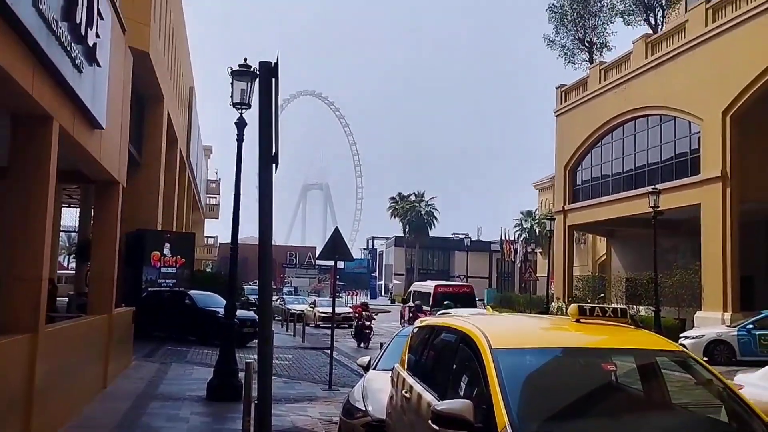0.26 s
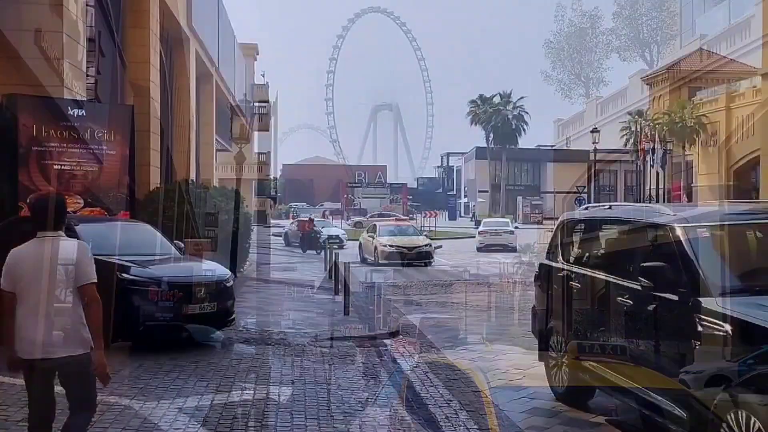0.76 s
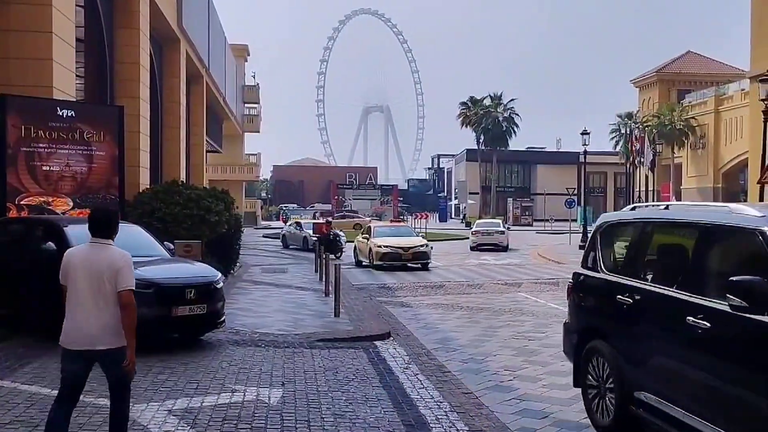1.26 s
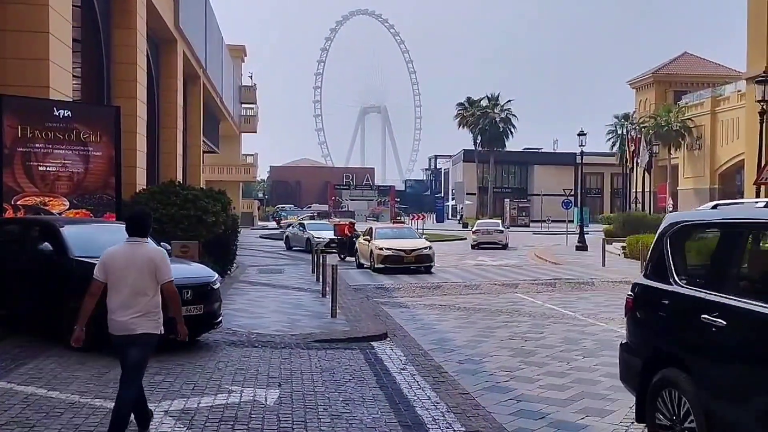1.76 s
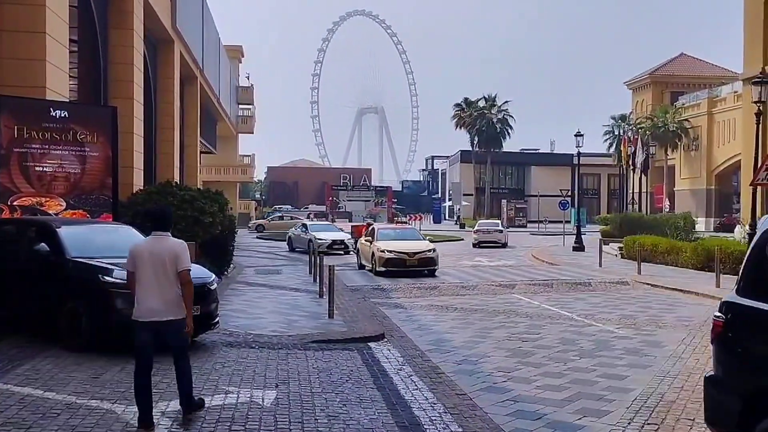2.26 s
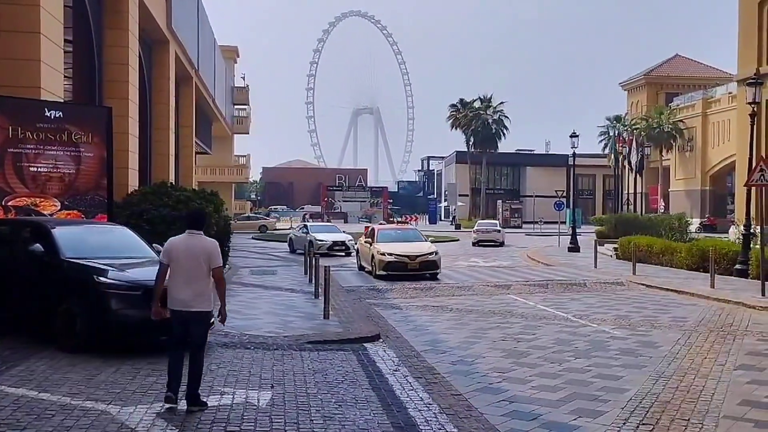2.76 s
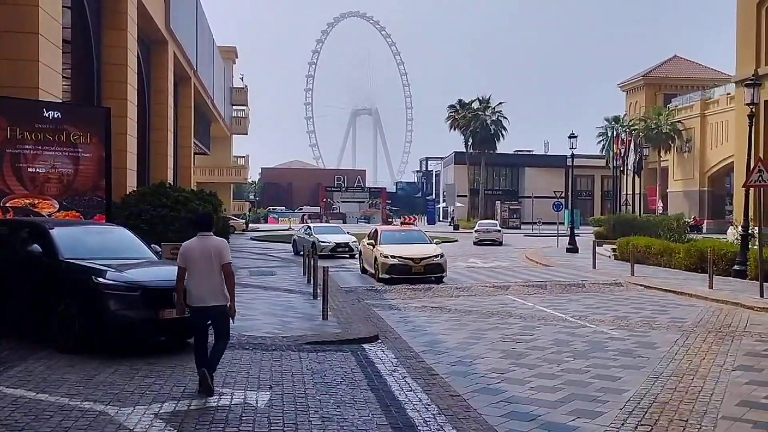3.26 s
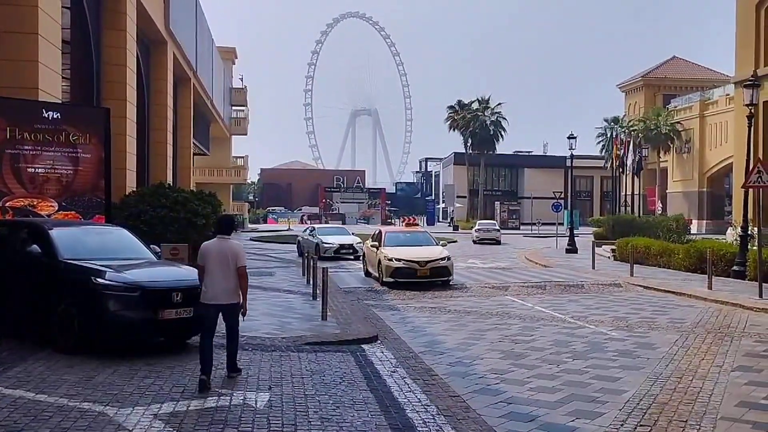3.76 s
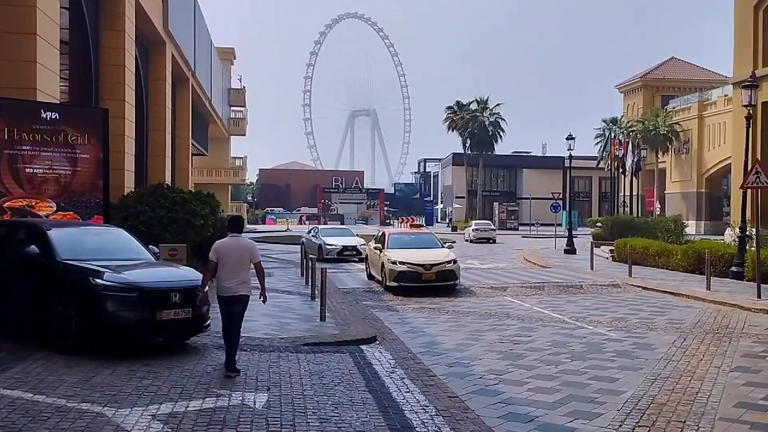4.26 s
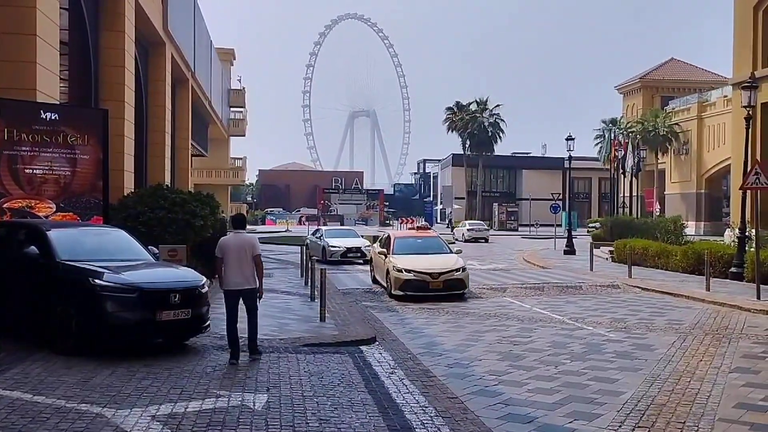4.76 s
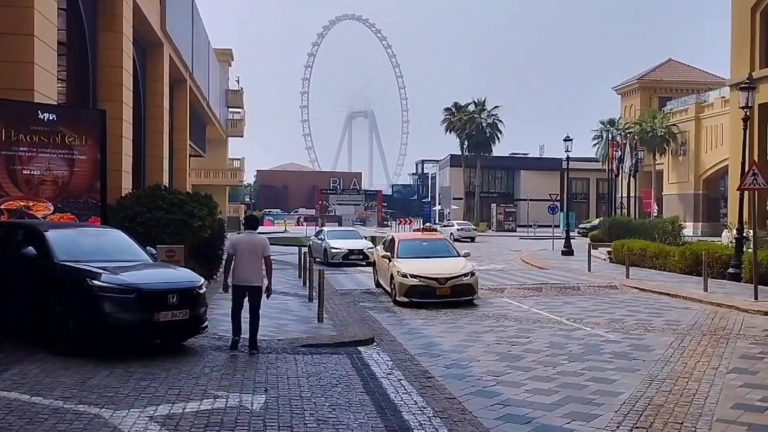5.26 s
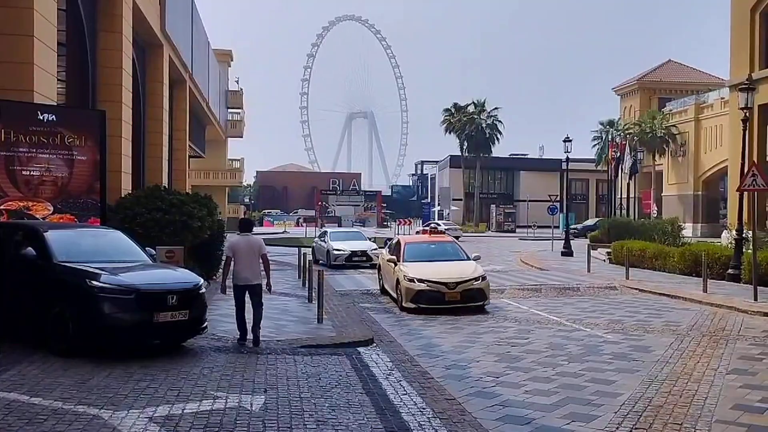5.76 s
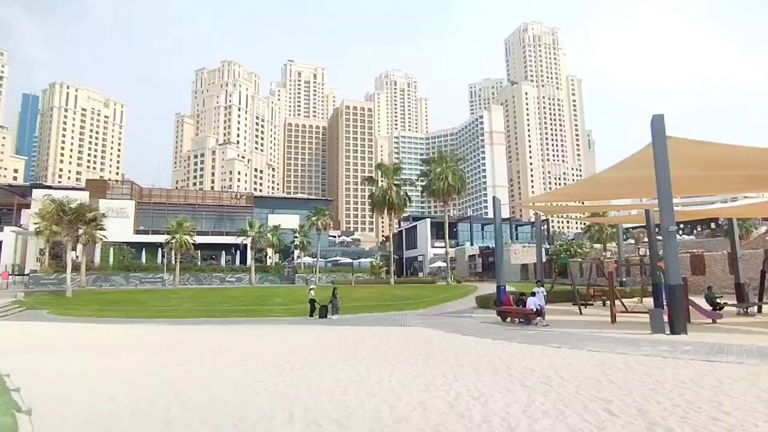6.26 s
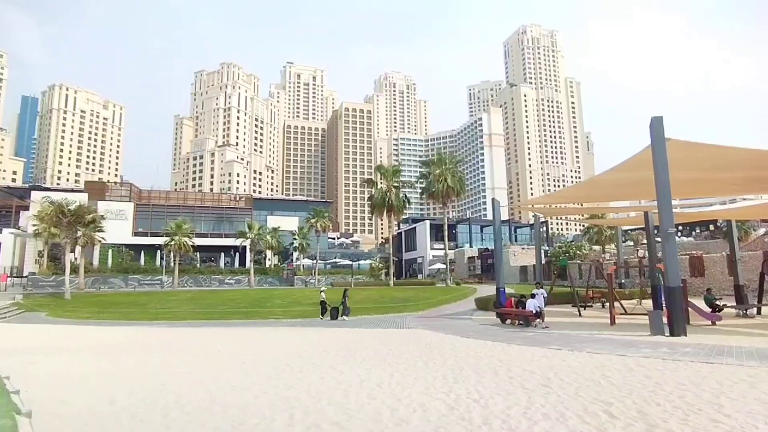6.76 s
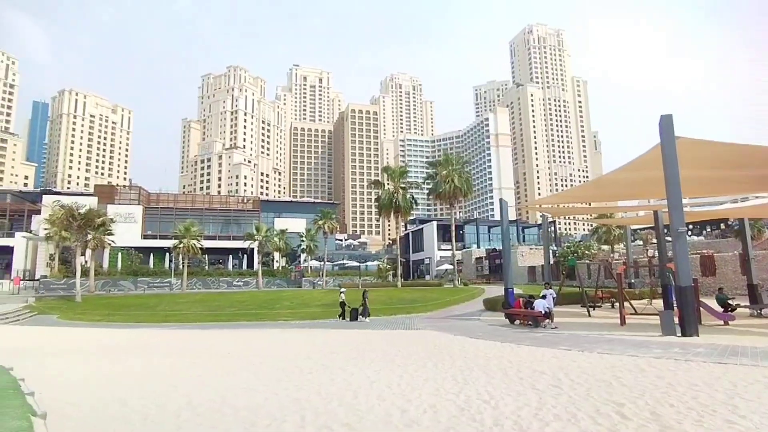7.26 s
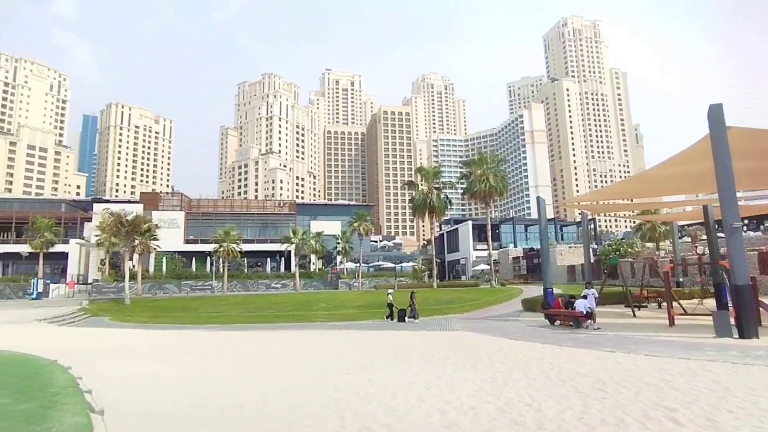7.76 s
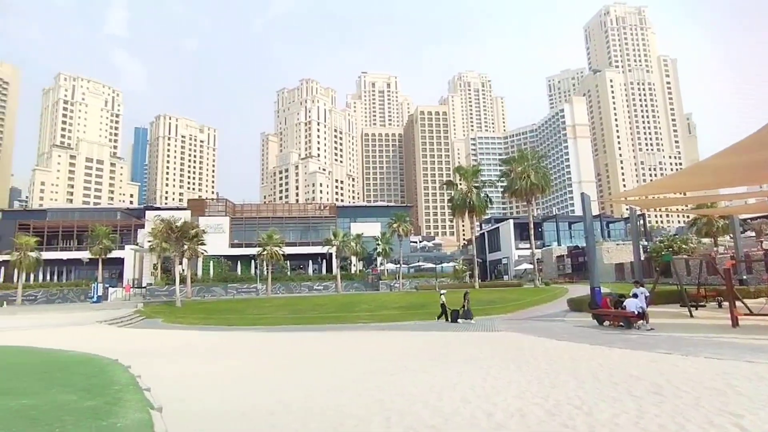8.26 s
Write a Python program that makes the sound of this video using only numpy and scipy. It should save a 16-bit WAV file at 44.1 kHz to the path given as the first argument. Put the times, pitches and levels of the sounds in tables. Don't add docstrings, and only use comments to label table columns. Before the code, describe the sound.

Steady street roar, engine hum and squeaky brakes stop abruptly; after a short gap, soft wind, close gritty crunches and a faint insect trill.

```python
import sys
import numpy as np
from scipy import signal
from scipy.fft import rfft, irfft, next_fast_len
from scipy.io import wavfile
from scipy.ndimage import uniform_filter1d, map_coordinates

SR = 44100
rng = np.random.default_rng(int(sys.argv[2]) if len(sys.argv) > 2 else 0)


def inscribe(sig):
    pcm = np.round(np.clip(np.atleast_2d(sig).T, -1, 1) * 32767)
    wavfile.write(sys.argv[1], SR, pcm.astype(np.int16))


def voltage_ratio(level):
    return 10 ** (np.asarray(level, float) / 20)


N = 375732
T = np.arange(N) / SR

STREET_LAG, PARK_LAG = 15, -22
DISSOLVE_START_S, DISSOLVE_END_S = 0.47, 1.02
WAKE_START_S = 6.232
ENGINE_RAMP_S = 0.081

# frequency [Hz], left level [dB], right level [dB].
PARK_TREBLE = [(1500, -48, -47), (1950, -47.5, -46.5), (2600, -51.5, -46.5), (3730, -59.5, -55),
               (4700, -63, -53.5), (5620, -68, -56.5), (6900, -73, -66), (7650, -72, -86), (8150, -79, -86),
               (9400, -72, -74), (10300, -72, -75), (11050, -72, -86), (12400, -65.5, -74),
               (15000, -69, -74), (15600, -65.5, -72.5)]
# time [s], gain [dB].
PARK_FADE = [(6.204, -14), (6.215, -3), (6.232, -6), (6.238, 2), (6.3, 4.5), (9, 5.5)]


def unit(x):
    return x / np.sqrt(np.mean(np.atleast_2d(x).mean(0) ** 2) + 1e-20)


def along(points, hz):
    f, *cols = np.transpose(points)
    return np.array([np.interp(np.log(hz + 1), np.log(f + 1), c) for c in cols])


def curves(rows):
    s, *cols = np.transpose(rows)
    return [np.interp(T, s, c) for c in cols]


def wobble(rate):
    coarse_s = np.arange(0, N + 16, 16) / SR
    knots = rng.standard_normal(int(N * rate / SR) + 4)
    return np.interp(T, coarse_s, map_coordinates(knots, [coarse_s * rate]))


def filtered(x, response):
    m = next_fast_len(x.shape[-1] + 8192)
    spectrum = rfft(x, m) * response(np.fft.rfftfreq(m, 1 / SR))
    return irfft(spectrum, m)[..., :x.shape[-1]]


def tone(hz, db, drift_hz, flutter_db, rate):
    level = np.sqrt(2) * voltage_ratio(db + flutter_db * wobble(rate))
    phase = 2 * np.pi * np.cumsum(hz + drift_hz * wobble(rate)) / SR
    return level * np.sin(phase)


def spells(rows, ramp_s):
    gain = np.zeros(N)
    for start_s, end_s, db in rows:
        rise = np.clip((T - start_s) / ramp_s + .5, 0, 1)
        fall = np.clip((end_s - T) / ramp_s + .5, 0, 1)
        gain += voltage_ratio(db) * rise * fall
    return gain


def layers(low, high, alike, lag, patchy_db):
    cross_hz = [130, 1500, 8100]
    z = signal.stft(rng.standard_normal((2, N)), nperseg=512)[2]
    field = uniform_filter1d(rng.standard_normal(z.shape[1:]), size=6, axis=0)
    field = uniform_filter1d(field, size=12, axis=1)
    pair = signal.istft(z * voltage_ratio(patchy_db * field / field.std()), nperseg=512)[1][:, :N]

    def split(hz):
        turn = np.arccos(np.clip(along(alike, hz)[0], -1, 1)) / 2
        return np.array([np.cos(turn), np.sin(turn)])

    def colour(hz):
        late = np.exp(np.outer([-1j, 1j], np.pi * hz * lag / SR * (hz > 1200)))
        return voltage_ratio(along(low + high[1:], hz)) * late

    same, other = filtered(pair, split)
    ports = filtered(np.array([same + other, same - other]), colour)
    below = [filtered(ports, lambda hz: 1 / (1 + (hz / edge) ** 12)) for edge in cross_hz]
    return [unit(hi - lo) for lo, hi in zip([0] + below, below + [ports])]


def traffic(share):
    # frequency [Hz], left level [dB], right level [dB].
    kerb_low = [(5, 4, -9), (12, -11, 10.5), (25, -5, 1), (45, -1, 1), (91.4, 4.5, -12), (129, -13.5, 1.5),
                (189, -5, -20.5), (260, -10.5, -5), (342, -11.5, -15), (415, -19, -14), (600, -20.5, -21),
                (840, -25, -22.5), (1160, -28, -26.5), (1500, -32, -30)]
    kerb_high = [(1500, -31, -29), (1950, -34.5, -33), (2620, -35, -31), (3030, -40.5, -34.5),
                 (3600, -42, -34.5), (4640, -43, -38), (5500, -58, -41), (6600, -60, -41.5),
                 (7400, -62, -51.5), (8050, -62, -53.5), (10400, -49.5, -56.5), (11150, -65.5, -61),
                 (12100, -50, -51.5), (15000, -47.5, -54), (15700, -51, -46.5)]
    street_low = [(5, -17, -21), (12, -17, -29), (25, -10.5, 0.5), (45, -8, -10.5), (99, -10, -7),
                  (129, -11, -11), (197, -11.5, -10.5), (258, -14, -13), (304, -13, -13), (393, -16.5, -17),
                  (620, -21.5, -21), (825, -22.5, -22), (1114, -26.5, -28.5), (1560, -29, -30)]
    street_high = [(1500, -29, -29), (1920, -33, -33.5), (2580, -38, -32.5), (3700, -43, -35),
                   (4730, -45, -38.5), (5570, -43.5, -43.5), (6800, -52.5, -50), (7640, -54, -57.5),
                   (8500, -55, -71), (9620, -50.5, -59), (10900, -51, -74), (12500, -46, -59),
                   (15300, -50, -59), (15700, -54, -53.5)]
    # frequency [Hz], correlation [-1..1].
    alike = [(20, 0.86), (60, 0.94), (150, 0.97), (300, 0.91), (640, 0.69), (1200, 0.24), (1700, 0.48),
             (2100, 0.56), (2600, 0.11), (3400, 0.064), (4200, 0.091), (5800, 0.18), (7000, .05)]
    # time [s], nearness [dB], bearing [-1 right .. 1 left].
    passing = [(0, 6.5, 0.38), (.29, 3, 0.046), (.59, -5, -0.59), (1.0, -3.5, -0.47), (1.35, 1, -0.35),
               (2.7, 4.5, -0.14), (3.4, 3.5, 0.14), (4.45, 3, .4), (4.7, 0, .2), (5.2, -3.5, -0.41),
               (6.09, -4, -0.18)]
    # time [s], rumble gain [dB].
    heavy = [(0, 1), (.3, 0), (.55, 0), (1.0, -1.5), (1.4, -3), (2.6, 2), (3.6, 0.5), (4.5, 1), (4.7, -3),
             (5.15, 3), (5.35, -2.5), (6.09, -2.5)]
    kerb_db = [-24, -27.5, -41.5, -56]
    street_db = [-27, -28.5, -43, -56.5]
    grows = [.05, .15, .35, 1.0]
    lean_db, rest_lean_db, swell_db = 9, -2.5, -0.3

    kerb = layers(kerb_low, kerb_high, alike, STREET_LAG, patchy_db=1.0)
    street = layers(street_low, street_high, alike, STREET_LAG, patchy_db=0.36)
    near_db, bearing = curves(passing)
    mixed = []
    for grow, a_db, b_db, a, b in zip(grows, kerb_db, street_db, kerb, street):
        both = voltage_ratio(a_db) * np.sqrt(1 - share) * a + voltage_ratio(b_db) * np.sqrt(share) * b
        mixed.append(voltage_ratio(grow * near_db) * both)
    rumble, roar, tyres, air = mixed
    rumble = rumble * voltage_ratio(curves(heavy)[0] + swell_db * wobble(3.1))
    air = air * voltage_ratio(np.outer([0, -1], rest_lean_db + lean_db * bearing))
    return rumble + roar + tyres + air


def sparrows():
    # middle [s], pitch [Hz], length [s], level [dB], left minus right [dB].
    chirps = [(.178, 4600, .045, -56, -2), (.45, 2680, .04, -44, -3), (.88, 5570, .08, -57, 3),
              (1.37, 5150, 0.045, -47, 3), (3.37, 4385, .055, -45, -3), (4.008, 4680, .06, -42.5, -5),
              (4.022, 4280, .05, -54, 0), (4.11, 5260, .04, -49, 3), (4.192, 4238, 0.047, -50, -3),
              (4.89, 5150, 0.05, -49, 2), (5.402, 5150, .04, -52, 1), (5.45, 5200, .04, -56, 4),
              (7.12, 5100, .04, -67, -14), (8.12, 4200, .03, -64, -8), (7.1, 2400, .05, -60, -4)]
    sag, arch = -0.006, .02
    out = np.zeros((2, N))
    flutter = voltage_ratio(3.2 * wobble(200) - 1.5)
    for s, hz, length_s, db, pan_db in chirps:
        count = int(length_s * SR)
        start = int((s - length_s / 2) * SR)
        u = np.arange(count) / count
        swell = np.sin(np.pi * u)
        pitch_hz = hz * (1 + sag * (u - .5) + arch * (swell - .7)) + 15 * np.sin(12 * u)
        note = swell ** 0.58 * flutter[start:][:count] * np.sin(2 * np.pi * np.cumsum(pitch_hz) / SR)
        out[:, start:][:, :count] += np.outer(voltage_ratio(db + np.array([.5, -.5]) * pan_db), note)
    return out


def engines():
    # start [s], end [s], level [dB].
    idle = [
        (1.3, 3.7, -32),
        (3.7, 6.193, -33),
    ]
    # time [s], pitch [Hz], level [dB].
    pulling = [(.7, 151, -33), (1.5, 154, -32), (1.9, 143, -36), (2.4, 153, -31.5), (4.1, 146, -34),
               (4.5, 145, -76), (4.95, 143, -30), (5.25, 146.3, -51), (5.55, 144, -29.5),
               (6.09, 145, -41.5)]
    # engine order [Hz], level [dB].
    drones = [(228, -49), (270, -43.5), (306, -51), (345, -48), (652, -53.5)]
    out = spells(idle, ENGINE_RAMP_S) * tone(69.7, 0, 2.515, 1.3, rate=8)
    out = out + tone(*curves(pulling), 1.82, 1.5, rate=9)
    return out + sum(tone(hz, db, 1.516, 2.1, rate=4) for hz, db in drones)


def fan_whistle():
    # time [s], pitch [Hz], level [dB].
    whistle = [(1.6, 7360, -66), (2.2, 7240, -51), (3.0, 7200, -54), (3.55, 6960, -49.5), (4.4, 6900, -54),
               (4.8, 6950, -94)]
    return np.array([tone(*curves(whistle), 30, 1.5, rate=8) * wobble(800) * voltage_ratio(db) for db in (-6, -10)])


def brake_squeal():
    # start [s], end [s], level [dB].
    squeals = [(.75, .82, -45), (1.1, 1.15, -52), (1.2, 1.46, -57), (4.15, 5.95, -65), (3.2, 3.4, -64),
               (4.18, 4.36, -55), (4.39, 4.49, -49.5), (4.53, 4.58, -49), (4.67, 4.82, -52.5),
               (4.92, 4.97, -49), (5.01, 5.07, -51), (5.15, 5.3, -46), (5.35, 5.43, -56), (5.47, 5.62, -59),
               (5.71, 5.86, -59)]
    grip = spells(squeals, 0.056) * tone(2800 + 14 * wobble(15), -1, 18, 3, rate=90)
    return np.array([voltage_ratio(-3) * np.roll(grip, STREET_LAG), voltage_ratio(2.5) * grip])


def machine_hum():
    # start [s], end [s], level [dB].
    hum = [
        (.9, 4.4, -40),
        (4.4, 5.8, -59),
        (5.8, 6.9, -44),
    ]
    octave = [(2.9, 6.2, -50.5)]
    hum_hz = 370
    low = spells(hum, ENGINE_RAMP_S) * tone(hum_hz, 1, 0.81, 1.2, rate=7)
    return low + spells(octave, ENGINE_RAMP_S) * tone(2 * hum_hz, 0, 1.24, 3.1, rate=3.94)


def tick():
    at_s, level_db = 5.9073, -38
    click = 1. * (np.arange(N) == int(at_s * SR))
    click = filtered(click, lambda hz: 1 / (1 + (11000 / (hz + 1)) ** 8))
    return np.outer([voltage_ratio(level_db + 26), 0], click)


def far_machinery(roar_db):
    # pitch [Hz], level [dB].
    park_tones = [(1314, -77.5), (2094, -82.5), (2589, -88)]
    tones = sum(tone(hz, db + roar_db + 47.5, 8.5, 2, rate=15) for hz, db in park_tones)
    return np.outer(voltage_ratio([-4, 3]), tones)


def park_wind():
    # frequency [Hz], left level [dB], right level [dB].
    park_low = [(5, 5.5, -22), (12, -32, -1.5), (25, -16, -16), (44.3, -18, -5), (100, -9.5, -14.5),
                (115, -15.5, -14.5), (178, -23, -21), (268, -22.5, -22), (343, -32.5, -26),
                (423, -29, -36.5), (680, -37.5, -34.5), (950, -44, -42), (1190, -44, -41),
                (1480, -49.5, -45.5)]
    # frequency [Hz], correlation [-1..1].
    alike = [(20, 0.43), (60, 0.84), (130, 1), (300, 0.89), (640, 0.72), (1100, 0.083), (1800, 0.092),
             (2600, 0.14), (4000, 0.16), (7500, .4), (11000, .1)]
    # time [s], gust level [dB], left minus right [dB].
    gusts = [(6.25, -46, -8), (6.47, -34.5, -7), (6.6, -35.5, 3), (7.17, -33.5, -9), (7.33, -37.5, -5),
             (7.5, -34, 0), (7.75, -39, 3), (8.03, -37.5, 1), (8.52, -41.5, 3)]
    wake_db = [-9, -7, -7]
    wake_s = .09
    buffet, roar, rustle, air = layers(park_low, PARK_TREBLE, alike, PARK_LAG, patchy_db=1.2)
    buffet_db, pan_db = curves(gusts)
    asleep = np.exp(-np.clip(T - WAKE_START_S, 0, None) / wake_s)
    roar_db, rustle_db, air_db = np.outer(wake_db, asleep) + [[-44.5], [-66.5], [-77.5]]
    slow = np.sqrt(abs(uniform_filter1d(buffet ** 2, size=6000, axis=1)) + .05)
    wind = unit(buffet / slow * voltage_ratio(1.6 * wobble(9)))
    wind = wind * voltage_ratio(buffet_db + np.outer([.5, -.5], pan_db - 0.5))
    clumps = .5 * wobble(28) + 1.17 * wobble(90)
    rustle = voltage_ratio(rustle_db + 1.24 * clumps) * rustle
    air = voltage_ratio(air_db + 1.1 * clumps + np.outer([3.3, .8], wobble(13)) - 0.3) * air
    return wind + voltage_ratio(roar_db) * roar + rustle + air + far_machinery(roar_db)


def bursts(times_s, levels_db, length_s):
    out = np.zeros(N)
    for s, db, spread in zip(times_s, levels_db, rng.standard_normal(len(times_s))):
        u = np.arange(SR // 20) / SR / (length_s * np.exp(.2 * spread))
        start = int((s - length_s) * SR)
        swell = voltage_ratio(db) * np.exp(2) / 4 * u ** 2 * np.exp(-u)
        out[start:][:len(u)] += swell[:N - start]
    return out


def crunches():
    # time [s], cavity ring [dB], bright snap [dB].
    hits = [(6.235, -61, -64), (6.3246, -53, -66), (6.356, -46, -57), (6.405, -51, -54),
            (6.4364, -42.5, -51.5), (6.493, -45, -53), (6.527, -47, -55), (6.582, -48, -56),
            (6.667, -48, -58), (6.699, -44, -51), (6.7895, -53, -56), (6.8429, -47, -55.5),
            (6.8855, -54, -61), (6.9367, -64, -64), (7.0885, -57, -62), (7.2617, -51, -58),
            (7.2974, -57, -59), (7.3967, -50, -61), (7.452, -50, -70), (7.582, -42, -57),
            (7.6536, -49, -68), (7.7487, -41, -50), (7.838, -57, -61), (8.137, -58, -66),
            (8.1705, -50, -61.5), (8.2662, -53, -71), (8.3595, -49, -55.5), (8.4114, -55, -64),
            (8.4757, -58, -64), (8.502, -55, -63), (6.467, -60, -68), (6.7287, -63, -70),
            (6.7601, -58, -70), (7.0595, -55, -70), (7.1128, -54, -70), (7.3753, -65, -67),
            (7.6292, -56, -65), (7.723, -55, -69), (7.7709, -55, -69), (7.906, -61, -71), (7.94, -55, -68),
            (7.9734, -60, -72), (8.0303, -56, -71), (8.3196, -56, -69), (8.3884, -60, -69)]
    # time [s], peak level [dB].
    lone_snaps = [(6.2797, -62), (6.383, -62), (6.4638, -63), (6.9217, -64), (7.1627, -62), (7.2021, -58),
                  (7.5448, -58), (7.5623, -56), (7.68, -50.5), (7.7199, -63), (7.8746, -53), (7.9344, -63),
                  (8.0766, -52), (8.2293, -65), (8.3265, -59)]
    stray_count, stray_db = 30, -76
    cavity_hz, cavity_width_hz = 5700, 1600
    scrape_at_s, scrape_rise_s, scrape_sag_db_per_s = 5.5, 0.05, -14
    s, ring_db, snap_db = np.transpose(hits)
    lone_s, lone_db = np.transpose(lone_snaps)
    stray_s = rng.uniform(PARK_FADE[0][0] + .1, T[-1], stray_count)
    scratch_db = -63 + .4 * (ring_db - ring_db.mean()) + 3 * rng.standard_normal(len(s))

    def cavity(hz):
        damping = 1j * hz * cavity_width_hz
        return (damping / (cavity_hz ** 2 - hz * hz + damping)) ** 2

    grains = rng.standard_normal((4, N)) * voltage_ratio(3.3 * np.array([wobble(500) for _ in range(4)]))
    ring = unit(filtered(grains[0], cavity))
    low = unit(filtered(grains[1], lambda hz: np.exp(-(np.log((hz + 1) / 2700) / 0.5) ** 2)))
    top = unit(filtered(grains[2:], lambda hz: voltage_ratio(along(PARK_TREBLE, hz) + [[0], [-5]]) * (hz > 8100)))

    since_s = T - scrape_at_s
    stroke = voltage_ratio(-74.5 + scrape_sag_db_per_s * np.clip(since_s, 0, None)) + voltage_ratio(-75)
    scrape = stroke * np.exp(np.clip(since_s, None, 0) / scrape_rise_s) * voltage_ratio(1.8 * wobble(45))
    stray = bursts(stray_s, stray_db + 2.3 * rng.standard_normal(stray_count), 0.0016)
    lone = bursts(lone_s, lone_db - 12.0, .002)
    near = (bursts(s, ring_db - 11.0, 0.0014) + scrape + stray) * ring
    near = near + (bursts(s, scratch_db, 0.0013) + stray + voltage_ratio(-1) * lone) * low
    snaps = (bursts(s, snap_db - 12, 0.0027) + lone + voltage_ratio(-5.0) * stray) * top
    return np.array([voltage_ratio(-7.5) * near, voltage_ratio(1.5) * np.roll(near, -PARK_LAG)]) + snaps


def insect():
    # start [s], end [s], pulse rate [1/s], level [dB].
    trills = [
        (7.659, 7.996, 33, -64),
        (8.226, 8.52, 34, -59.5),
    ]
    # frequency [Hz], width [Hz], level [dB].
    wing = [(5120, 150, -3.5), (5540, 121, 0), (5900, 200, -7)]
    puffs = np.zeros(N)
    for start_s, end_s, rate, db in trills:
        beat = np.cos(np.pi * rate * (T - start_s - .01 + .008 * wobble(25))) ** 2
        puffs += voltage_ratio(db) * ((T > start_s) & (T < end_s)) * (0.26 + beat)

    def resonances(hz):
        total = 0
        for k, (centre, width, db) in enumerate(wing):
            damping = 1j * hz * width
            total = total + (-1) ** k * voltage_ratio(db) * damping / (centre * centre - hz * hz + damping)
        return total

    scraping = puffs * voltage_ratio(2.1 * wobble(70) - 4.0) * rng.standard_normal(N)
    song = filtered(scraping, resonances) * voltage_ratio(20.0)
    return np.array([voltage_ratio(-12.0) * song, voltage_ratio(-0.5) * np.roll(song, -PARK_LAG)])


def offset_swing():
    age = np.clip(T - WAKE_START_S, 0, None) / .085
    swing = 3.6 * age ** 1.5 * np.exp(-age) - .3 * (1 - np.exp(-age)) * np.exp(-age / 14)
    return np.outer(voltage_ratio([-27, -31]), swing)


def scene():
    cut_s, cut_ramp_s = 6.0942, .0012
    share = np.clip((T - DISSOLVE_START_S) / (DISSOLVE_END_S - DISSOLVE_START_S), 0, 1)
    machines = np.outer(voltage_ratio([-.6, .4]), engines() + machine_hum()) + fan_whistle() + brake_squeal()
    town = traffic(share) + np.sqrt(share) * machines
    residue = voltage_ratio(-71 - 1400 * np.clip(T - cut_s, 0, .1)) * (T < cut_s + .03)
    town = town * np.where(T < cut_s, np.clip((cut_s - T) / cut_ramp_s, 0, 1), residue)
    park = park_wind() + crunches() + insect()
    park = park * voltage_ratio(curves(PARK_FADE)[0]) * (T > PARK_FADE[0][0])
    return town + park + offset_swing() + sparrows() + tick()


def starved(x, margin_db):
    lead = 398
    window = np.sin(np.pi * (np.arange(2048) + .5) / 2048)
    padded = np.pad(x, ((0, 0), (lead, 0)))
    hz, s, z = signal.stft(padded, SR, window, nperseg=2048, noverlap=1024)
    band = np.arange(len(hz)) // 8 * 8 + 4
    luck = voltage_ratio(3 * rng.standard_normal(z.shape))
    power = uniform_filter1d(abs(z) ** 2, size=8, axis=1) * luck
    power = power[:, band.clip(0, len(hz) - 1)]
    level = uniform_filter1d(power[:, (hz > 1500) & (hz < 7000)].mean((0, 1)), size=5)
    mixed_db = -5 * ((s > DISSOLVE_START_S + .08) & (s < DISSOLVE_END_S))
    keep = (power > level * voltage_ratio(2 * (margin_db + mixed_db))) | (hz[:, None] < 6000)
    return signal.istft(z * keep, SR, window, nperseg=2048, noverlap=1024)[1][:, lead:][:, :N]


def roll_off(x):
    return signal.sosfilt(signal.butter(12, 15830, fs=SR, output="sos"), x)


def record(dry):
    # frequency [Hz], width [Hz], left gain [dB], right gain [dB].
    notches = [(8130, 220, -4.5, -5.5), (11100, 365, -3, 3.5)]

    def ports(hz):
        dips_db = sum(np.outer(db, np.exp(-((hz - at) / width) ** 2)) for at, width, *db in notches)
        return voltage_ratio(dips_db) * (hz < 15830)

    mix = starved(filtered(dry, ports), margin_db=-21.5)
    return roll_off(mix)


dry = scene()
out = record(dry)
inscribe(out)
```